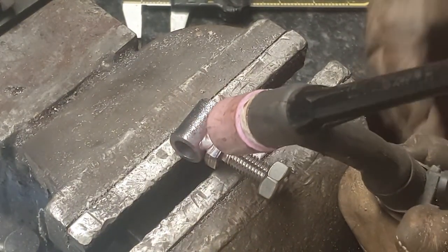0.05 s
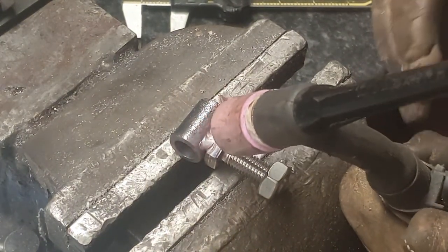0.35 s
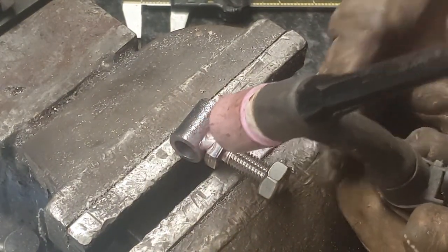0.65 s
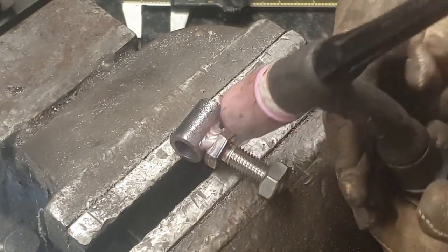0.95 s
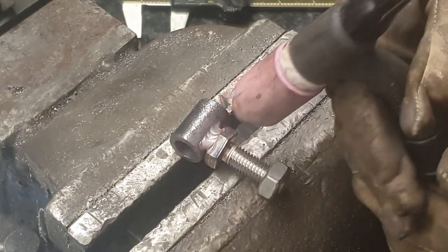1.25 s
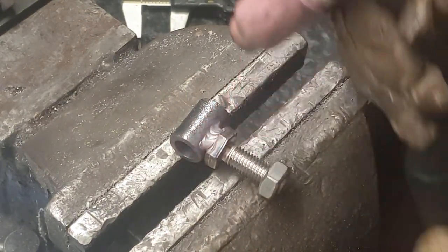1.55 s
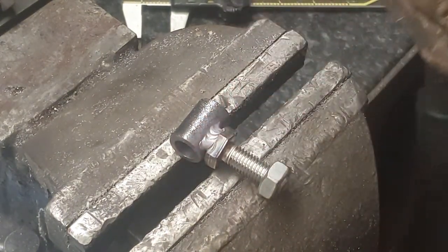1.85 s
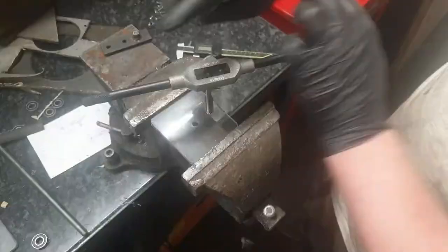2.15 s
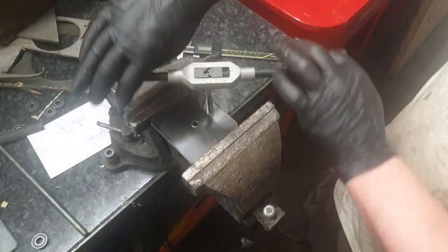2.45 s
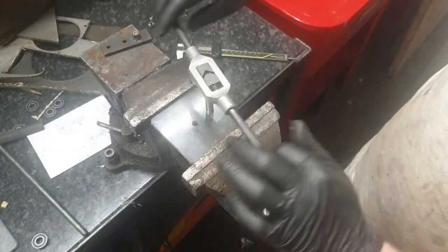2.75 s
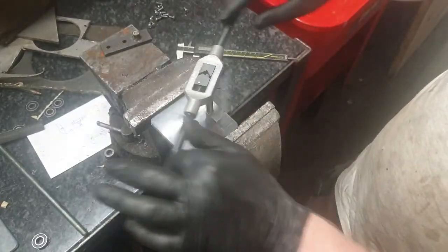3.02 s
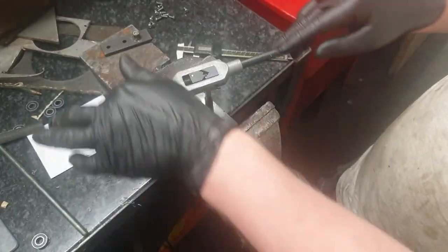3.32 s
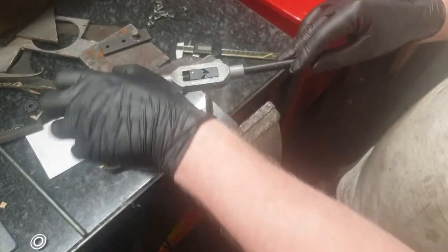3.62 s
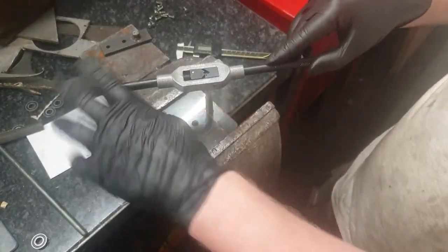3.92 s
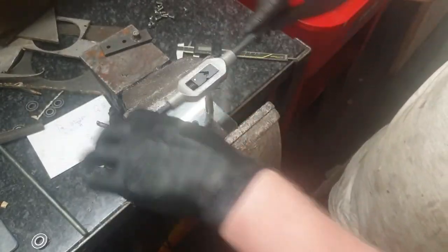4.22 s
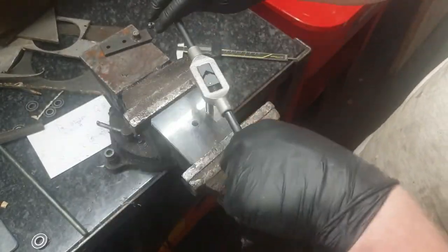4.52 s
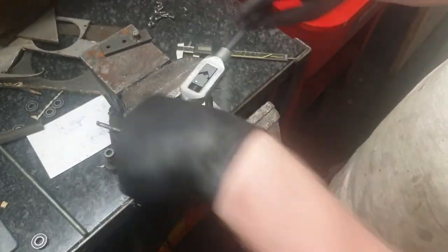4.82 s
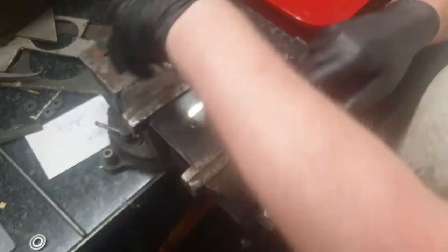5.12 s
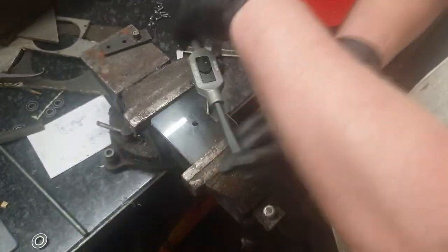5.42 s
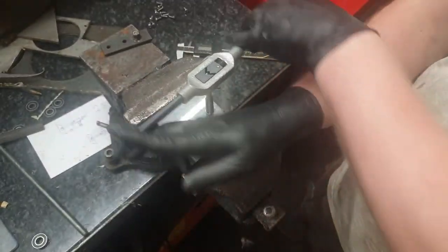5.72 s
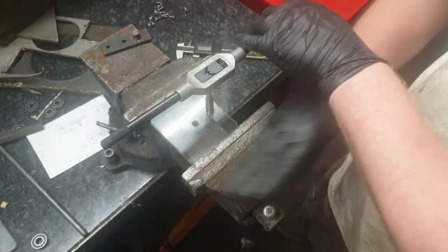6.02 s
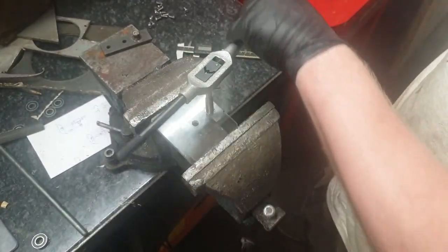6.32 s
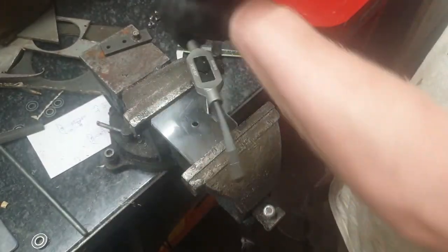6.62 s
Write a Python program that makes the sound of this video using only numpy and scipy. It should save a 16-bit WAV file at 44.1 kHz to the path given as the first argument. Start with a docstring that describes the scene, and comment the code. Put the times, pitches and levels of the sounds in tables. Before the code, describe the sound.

In a small workshop, a welding machine's cooling fan drones over a rush of air and gas. After about two seconds it cuts off abruptly. A hand tap then turns through steel held in a vise, heard close up: two main bursts of crisp, briefly ringing cracks and scraping as chips break, with faint thread squeaks. Soft low bench thuds and light glove rustles accompany the changes of grip.

```python
"""A TIG welder's cooling fan drones over a rush of air and gas in a small workshop.
At 2.2 s the scene cuts to a hand tap turning through steel in a vise: the teeth stick,
slip and crack off chips, ringing tap, wrench and workpiece; the thread squeaks faintly.
The bench thuds softly as the hands change grip, and gloves brush."""
import sys
import numpy as np
from scipy import signal
from scipy.fft import rfft, irfft, next_fast_len
from scipy.io import wavfile
from scipy.ndimage import map_coordinates

SR = 44100
rng = np.random.default_rng(int(sys.argv[2]) if len(sys.argv) > 2 else 0)


def to_wav(sig):
    """Store sig (one row per channel, or 1-D mono) as 16-bit WAV at the path in sys.argv[1].

    Samples outside -1..1 are clipped; the rate is SR.
    """
    pcm = np.clip(np.atleast_2d(sig), -1, 1) * 32767
    pcm = np.round(pcm).astype(np.int16)
    wavfile.write(sys.argv[1], SR, pcm.T)  # frames by channels


N = 293706
TIME_S = np.arange(N) / SR
CUT_S, TOP_HZ = 2.2083, 15900

# Levels are relative; balance is left minus right.
# fan tone's loudness as heard, wavering by chance against the air noise: t/s, level/dB
HEARD_TONE_LEVEL = [(0.0, -35), (0.35, -34), (1.17, -38), (1.38, -35.5), (1.66, -33.5), (1.9, -38),
                    (2.1, -33.5)]
# blade overtones: harmonic number, level/dB
BLADE_OVERTONES = [(2, -17.5), (3, -25.5), (5, -28.5), (7, -31.5), (9, -33), (12, -33)]
# resonances of welder and room colouring the fan noise: f/Hz, width/Hz, level/dB
FAN_NOISE_MODES = [(63, 25, -6), (91.7, 6.9, 3.5), (178.3, 19.3, 4.5), (207, 13, 9), (249, 44, 2),
                   (270.3, 8.1, 1), (304, 11, -2), (380, 34, -6.5), (377, 23, 0.5), (647, 42, -2),
                   (800, 44, -4), (910, 28, -4), (1052, 82, -7), (1187, 12, -16), (1287, 96, -8),
                   (1472, 93, -3.5)]
# air and shielding gas: f/Hz, level/dB
AIR_SPECTRUM = [(150, -39), (300, -23), (500, -1), (700, -1.5), (1100, -7.5), (2000, -6.5), (3000, -9),
                (4000, -11.5), (6200, -19), (8200, -32.5), (9800, -29), (11200, -30), (12500, -40),
                (16000, -52)]
# torch lifts and bares its gas jet: t/s, share open
JET_OPENING = [(1.3, 0), (1.7, 1)]
# welder noise: f/Hz, left-right coherence
FAN_COHERENCE = [(60, 0.93), (130, 0.97), (290, 0.99), (640, 0.66), (1410, 0.14), (3100, 0.18),
                 (6820, 0.01), (15000, -0.13)]
# welder: f/Hz, balance/dB
WELDER_PAN = [(60, -3), (150, -3), (380, -4), (950, -2.5), (2380, -4.0), (5980, -4.5), (15000, -4)]
# room tone: f/Hz, level/dB
ROOM_SPECTRUM = [(150, -1), (240, -6), (350, -10), (600, -11.5), (1200, -16.5), (1900, -17.5), (2550, -10),
                 (3600, -19.5), (6200, -21.5), (8200, -35), (11000, -19), (16000, -24)]
# room tone and bench rumble: f/Hz, left-right coherence
ROOM_COHERENCE = [(100, .95), (500, .6), (2000, .3), (12000, .3)]
# room tone: f/Hz, balance/dB
ROOM_PAN = [(200, -6.5), (1000, -3), (2500, -11), (5000, -6), (11000, -2)]
# bench rumble: f/Hz, level/dB
BENCH_SPECTRUM = [(12, -38), (20, -31.5), (47, -1.5), (69, 1.5), (106, -2.5), (140, -19), (173, -17),
                  (220, -31), (290, -38), (480, -120)]
# hands bumping the bench: t/s, level/dB
BENCH_BUMPS = [(2.41, -61), (3.04, -61), (3.44, -61.5), (3.834, -46.5), (4.103, -51), (4.84, -58.5),
               (5.1, -64), (5.59, -66), (6.119, -62), (6.47, -62)]
# wrench pushes: t/s, length/s, scrape level/dB, dullness/dB
WRENCH_PUSHES = [(2.41, 0.25, -85, -1), (2.555, 0.17, -70, 0.5), (2.837, 0.27, -67, 1),
                 (3.113, 0.41, -66, -0.5), (4.194, 0.28, -79, -4), (4.746, 0.32, -70, 2.5),
                 (5.097, 0.27, -64.5, 3), (5.42, 0.42, -64, 4), (6.588, 0.07, -79.5, -1)]
# chips cracking at the teeth: t/s, level/dB
CHIP_BREAKS = [(2.5563, -47), (2.6188, -41), (2.6474, -41), (2.6703, -33.5), (2.6939, -29.5), (2.7144, -43),
               (2.7419, -29), (2.839, -40), (2.8557, -40), (2.8865, -34.5), (2.9374, -44.5),
               (2.9596, -37.5), (3.016, -35.5), (3.124, -37), (3.1835, -42.5), (3.1961, -36.5),
               (3.2047, -32), (3.2444, -36), (3.2644, -28), (3.3084, -33), (3.3775, -33), (4.3385, -42.5),
               (4.3633, -50), (4.751, -49.5), (4.8444, -46), (5.1056, -47.5), (5.1333, -34),
               (5.1508, -36.5), (5.1874, -33), (5.2078, -33), (5.218, -26), (5.3044, -35.5), (5.3365, -41),
               (5.4123, -36.5), (5.4785, -31), (5.4891, -31.5), (5.5364, -36), (5.656, -41.5), (5.736, -40),
               (5.7469, -42.5), (5.769, -37.5), (5.778, -39.5), (5.818, -42.5)]
# tap, wrench and workpiece modes: f/Hz, width/Hz, level/dB
STEEL_MODES = [(1709, 58, 1), (1948, 143, 0), (2177, 167, -1), (2610, 225, -4), (2840, 230, -8.5),
               (2995, 250, -2.5), (3300, 150, -5.5), (3630, 340, -8), (4255, 380, -1), (4904, 136, 4),
               (5070, 286, -2), (5440, 410, -6.5), (5880, 180, -5), (6590, 700, -9.5), (7540, 890, -15.5),
               (8260, 270, -14.5), (9440, 660, -14.5), (10080, 330, -8), (11250, 1450, -9.5),
               (12500, 1060, -9)]
# broad crack under the modes: f/Hz, level/dB
CRACK_SPECTRUM = [(200, -47), (650, -24), (1000, -30.5), (1400, -23), (1700, -11.5), (2900, -15),
                  (4500, -40), (7000, -16.5), (8800, -32), (10500, -14), (12500, -22), (14000, -19),
                  (16000, -18.5)]
# workshop reverberation: f/Hz, T60/s
WORKSHOP_T60 = [(300, 0.17), (2000, 0.25), (6000, 0.25), (14000, 0.18)]
# thread squeaks: peak t/s, 1/e half-width/s, level/dB, f/Hz
THREAD_SQUEAKS = [(2.46, 0.044, -78, 4740), (4.25, 0.064, -81, 5140), (4.365, 0.035, -64.5, 2770),
                  (4.37, 0.042, -68, 5130), (6.65, 0.084, -76, 5100)]
# tool: f/Hz, balance/dB
TOOL_PAN = [(500, -2), (2000, -6), (5000, -6.5), (11000, -2)]
# gloves and sleeves brushing: peak t/s, 1/e half-width/s, level/dB, f/Hz
GLOVE_BRUSHES = [(3.72, 0.053, -79.5, 6030), (3.82, 0.16, -82.5, 11500), (3.882, 0.094, -80.5, 5640),
                 (4.67, 0.2, -73.5, 213), (5.395, 0.052, -75, 252), (6.0, 0.08, -81, 5840),
                 (6.06, 0.18, -75.5, 11500), (6.114, 0.02, -60.5, 11500), (6.115, 0.028, -70, 5500),
                 (6.503, 0.042, -73, 232)]
# gloves: f/Hz, balance/dB
GLOVE_PAN = [(200, -7), (2500, -11), (5500, -10), (10000, 0.5)]


def amp(db):
    """Decibels to gain."""
    return 10 ** (np.asarray(db) / 20)


def unit_rms(x):
    """Scale to rms 1."""
    return x / np.sqrt(np.mean(x ** 2) + 1e-20)


def at_hz(points, hz):
    """Interpolate (f/Hz, value) points on a log axis."""
    knots_hz, values = np.transpose(points)
    return np.interp(np.log(hz + 1), np.log(knots_hz + 1), values)


def over_time(points):
    """Interpolate (t/s, value) points at every sample."""
    return np.interp(TIME_S, *np.transpose(points))


def wobble(knots_per_s):
    """Smooth random curve."""
    knots = rng.standard_normal(int(N * knots_per_s / SR) + 4)
    return map_coordinates(knots, [TIME_S * knots_per_s])


def filtered(x, gain):
    """Zero-phase filter by gain(hz)."""
    size = next_fast_len(N + SR // 2, True)
    return irfft(rfft(x, size) * gain(np.fft.rfftfreq(size, 1 / SR)), size)[..., :N]


def panned(x, left_db):
    """Stereo with a left-minus-right level of left_db."""
    return x * amp(np.array([[1], [-1]]) * left_db / 2)


def placed(x, balance):
    """Pan each frequency separately."""
    return filtered(x, lambda hz: panned(0.98, at_hz(balance, hz)))


def resonances(modes, hz, order=1):
    """Gain of modes summed in power; higher order deepens the valleys."""
    power = 0
    for mode_hz, width_hz, db in modes:
        damping = (hz * width_hz) ** 2
        power += amp(db) ** 2 * (damping / ((mode_hz ** 2 - hz ** 2) ** 2 + damping)) ** order
    return np.sqrt(power)


def rush(gain, coherence):
    """Stereo noise, rms 1, of given colour and left-right coherence."""
    def mid_side_gain(hz):
        angle = np.arccos(np.clip(at_hz(coherence, hz), 0, 1)) / 2
        return gain(hz) * np.array([np.cos(angle), np.sin(angle)])
    mid, side = filtered(rng.standard_normal((2, N)), mid_side_gain)
    return unit_rms(np.array([mid + side, mid - side]))


def fan_hum(blade_pass_hz=232.8):
    """Blade tone and overtones, each wavering separately."""
    heard_db = over_time(HEARD_TONE_LEVEL)
    phase = 2 * np.pi * np.cumsum(blade_pass_hz + 0.27 * wobble(12.2)) / SR
    # intake turbulence: about 1 dB of flutter
    overtones = sum(amp(db + 0.97 * wobble(9.34)) * np.sin(k * phase + rng.uniform(0, 2 * np.pi))
                    for k, db in BLADE_OVERTONES)
    fundamental = amp(heard_db + 0.8 * wobble(21.93)) * np.sin(phase)
    return np.sqrt(2) * (fundamental + amp(np.mean(heard_db)) * overtones)


def welder():
    """The fan hums; its air stream rumbles, coloured by welder and room, and hisses with the gas."""
    def rumble_gain(hz):
        return resonances(FAN_NOISE_MODES, hz) * hz / np.hypot(hz, 60) / np.hypot(1, hz / 2500)
    hum = fan_hum()
    rumble = amp(-41) * rush(rumble_gain, FAN_COHERENCE)
    air = amp(-44 + 0.37 * wobble(10.44)) * rush(lambda hz: amp(at_hz(AIR_SPECTRUM, hz)), FAN_COHERENCE)
    jet = amp(-56.5) * rush(lambda hz: resonances([(3600, 1000, 0)], hz, order=3), FAN_COHERENCE)
    return placed(hum + rumble + air + over_time(JET_OPENING) * jet, WELDER_PAN)


def room_tone():
    """Faint steady background noise."""
    noise = rush(lambda hz: amp(at_hz(ROOM_SPECTRUM, hz)), ROOM_COHERENCE)
    return placed(amp(-73.5) * noise, ROOM_PAN)


def bench(thud_hz=80, rise_s=0.015, shudder_db=-11, shudder_s=0.26):
    """The heavy bench rumbles under the hands; each bump thuds and leaves it shuddering."""
    thuds = np.zeros(N)
    rumble_gain = amp(-73.5 + 2 * wobble(6.2))
    for bump_s, db in BENCH_BUMPS:
        t = np.maximum(TIME_S - bump_s, 0)
        thuds += amp(db) * t / rise_s * np.exp(1 - t / rise_s) * np.sin(2 * np.pi * thud_hz * t)
        shudder = amp(db + shudder_db) * (1 - np.exp(-t / rise_s)) * np.exp(-t / shudder_s)
        rumble_gain = np.hypot(rumble_gain, shudder)
    rumble = rumble_gain * rush(lambda hz: amp(at_hz(BENCH_SPECTRUM, hz)), ROOM_COHERENCE)
    return panned(thuds + rumble, left_db=-6.5)


def scrape_force(slips_per_s=1100, spread_db=4, clump_db=3, split_hz=1950,
                 attack_s=0.013, release_s=0.033, arch_db=2.5, drag_db=-33, drag_s=0.017):
    """Teeth stick and slip in clumps, hardest mid-push; broken chips drag in the flute."""
    sizes = amp(spread_db * np.clip(rng.standard_normal(N), -2, 2) + clump_db * wobble(60))
    slipping = rng.random(N) < slips_per_s / SR
    slips = unit_rms(slipping * rng.choice([-1, 1], N) * sizes)
    lows = filtered(slips, lambda hz: 1 / (1 + (hz / split_hz) ** 6))
    highs = slips - lows
    breaks = np.zeros(N)
    for break_s, db in CHIP_BREAKS:
        breaks[round(break_s * SR)] = amp(db + drag_db)
    drag = signal.lfilter([1], [1, -np.exp(-1 / (drag_s * SR))], breaks)
    force = drag * slips
    for start_s, length_s, db, dull_db in WRENCH_PUSHES:
        t = TIME_S - start_s
        effort = np.clip(t / attack_s, 0, 1) * np.exp(-np.maximum(t - length_s, 0) / release_s)
        arch = np.sin(np.pi * np.clip(t / length_s, 0, 1)) - 0.5
        force += effort * amp(db + arch_db * arch) * (amp(dull_db) * lows + amp(-dull_db / 2) * highs)
    return filtered(force, lambda hz: amp(at_hz([(2000, 2), (4500, -2), (12000, 0)], hz)))


def friction_swells(rows, half_band_oct):
    """Light rubbing: noise bands under Gaussian envelopes."""
    sound = np.zeros((2, N))
    for peak_s, half_width_s, db, hz in rows:
        edges_hz = np.clip(hz * 2.0 ** np.array([-half_band_oct, half_band_oct]), 20, SR / 2 - 100)
        bandpass = signal.butter(2, edges_hz, "band", fs=SR, output="sos")
        noise = rng.standard_normal((3, N))  # left, right, common
        band = unit_rms(signal.sosfilt(bandpass, noise[:2] + noise[2]))
        sound += amp(db) * np.exp(-((TIME_S - peak_s) / half_width_s) ** 2) * band
    return sound


def chip_force(crumble_db=1, crumble_s=0.0034, body_db=-1.5, treble_db=-0.5, scatter_db=1.5,
               body_db_per_db=-0.2, treble_db_per_db=0.12):
    """Each chip snaps with one jolt, then crumbles; bigger chips sound sharper."""
    force = np.zeros(N + SR)
    t = np.arange(2048) / SR
    hz = np.fft.rfftfreq(len(t), 1 / SR)
    mean_db = np.mean(CHIP_BREAKS, axis=0)[1]
    for break_s, db in CHIP_BREAKS:
        crumbs = rng.standard_normal(len(t)) * rng.exponential(size=len(t)) * np.exp(-t / crumble_s)
        jolt = amp(crumble_db) * crumbs / np.linalg.norm(crumbs)
        jolt[0] += 1
        # dullness follows the nearest push
        *_, dull_db = min(WRENCH_PUSHES, key=lambda p: abs(break_s - p[0] - p[1] / 2) - p[1] / 2)
        low_db = body_db + dull_db + body_db_per_db * (db - mean_db)
        high_db = treble_db + treble_db_per_db * (db - mean_db) + scatter_db * rng.standard_normal()
        tilt_db = at_hz([(2800, low_db), (4800, 0), (10000, high_db)], hz)
        crack = irfft(rfft(np.roll(jolt, 16)) * amp(tilt_db))
        force[round(break_s * SR):][:len(t)] += amp(db) * crack
    return force[:N]


def steel_response(size=8192):
    """Steel modes over a broad crack: minimum-phase impulse response, energy 1."""
    hz = np.fft.rfftfreq(size, 1 / SR)
    gain = np.hypot(resonances(STEEL_MODES, hz, order=2), amp(at_hz(CRACK_SPECTRUM, hz) - 2.5))
    cepstrum = irfft(np.log(np.maximum(gain, 1e-6)))
    cepstrum[1:size // 2] *= 2
    cepstrum[size // 2 + 1:] = 0
    response = irfft(np.exp(rfft(cepstrum)))
    return response / np.linalg.norm(response)


def workshop(x, near_db=2.5, near_t60_s=0.0076, tail_db=2, block=4096):
    """Add vise and bench reflections and room tail, redrawn per block as hands and wrench move."""
    wet = np.zeros((2, N + SR))
    for start in range(0, N, block):
        hz, t, spectra = signal.stft(rng.standard_normal((2, SR // 5)), SR, nperseg=256)
        decay = amp(-60 * t / at_hz(WORKSHOP_T60, hz)[:, None])
        _, tail = signal.istft(spectra * decay, SR, nperseg=256)
        near = rng.standard_normal(tail.shape) * amp(-60 * TIME_S[:tail.shape[1]] / near_t60_s)
        response = sum(amp(db) * part / np.linalg.norm(part, axis=1, keepdims=True)
                       for db, part in [(near_db, near), (tail_db, tail)])
        echo = signal.fftconvolve(x[None, start:start + block], response, axes=1)
        wet[:, start:start + echo.shape[1]] += echo
    return x + wet[:, :N]


def hand_tap():
    """Chips and scraping ring the same steel; the thread squeaks under light rubbing."""
    force = amp(5.5) * chip_force() + scrape_force()
    ringing = workshop(signal.fftconvolve(force, steel_response())[:N])
    squeaks = friction_swells(THREAD_SQUEAKS, half_band_oct=0.049)
    return placed(ringing + squeaks, TOOL_PAN)


def gloves():
    """Rubber and cloth rub as the hands move round."""
    return placed(friction_swells(GLOVE_BRUSHES, half_band_oct=0.22), GLOVE_PAN)


def scene():
    """Welder, then a hard cut to tapping; room tone throughout."""
    before_cut = np.clip((CUT_S - TIME_S) / 0.0003, 0, 1)
    return room_tone() + before_cut * welder() + (1 - before_cut) * (hand_tap() + bench() + gloves())


def record(dry):
    """Brick-wall low-pass at TOP_HZ."""
    return filtered(dry, lambda hz: hz < TOP_HZ)


dry = scene()
out = record(dry)
to_wav(out)
```